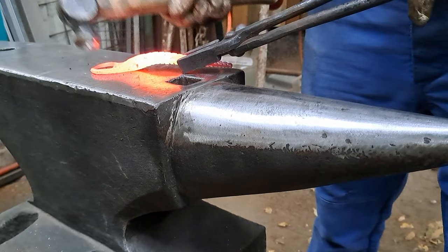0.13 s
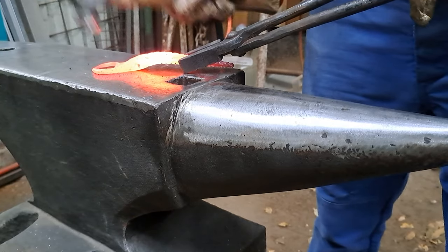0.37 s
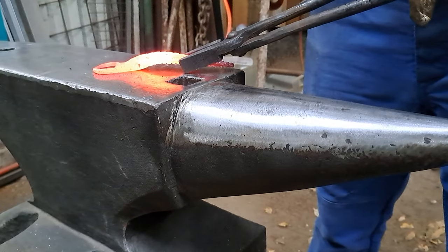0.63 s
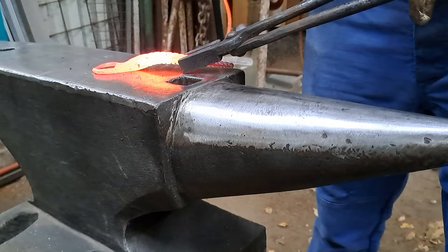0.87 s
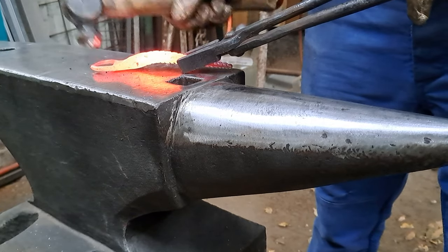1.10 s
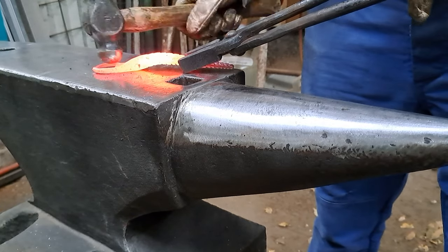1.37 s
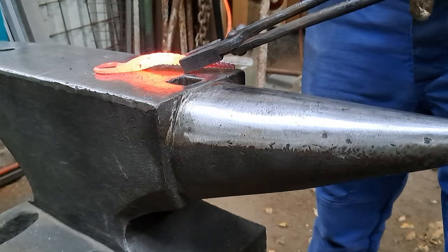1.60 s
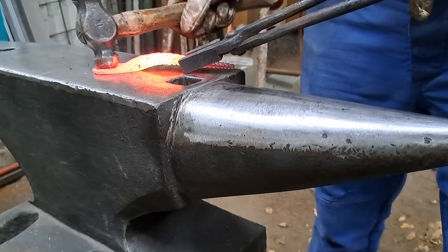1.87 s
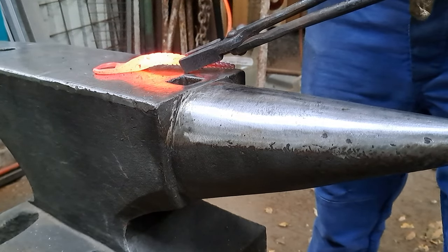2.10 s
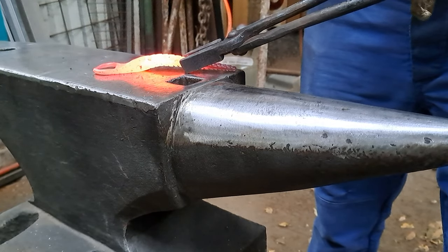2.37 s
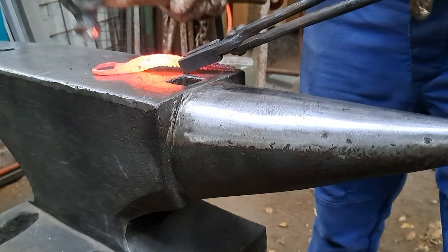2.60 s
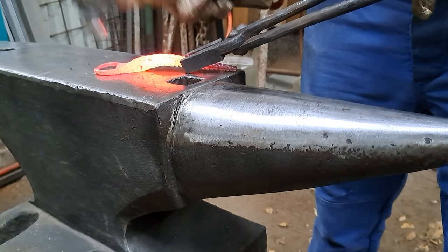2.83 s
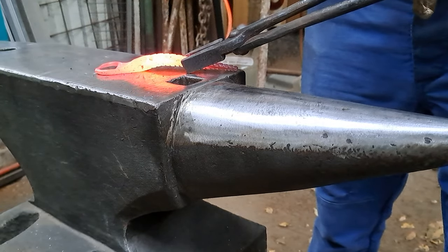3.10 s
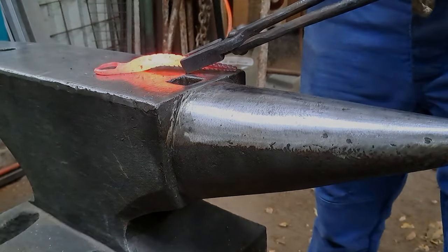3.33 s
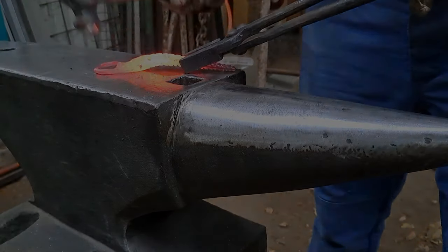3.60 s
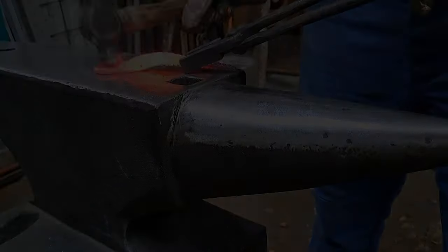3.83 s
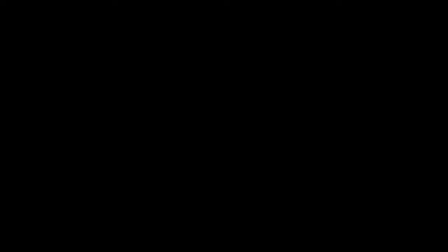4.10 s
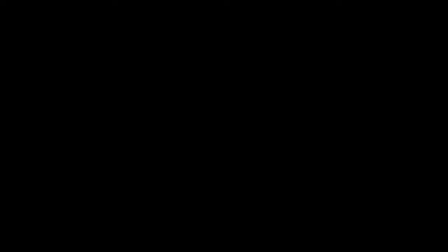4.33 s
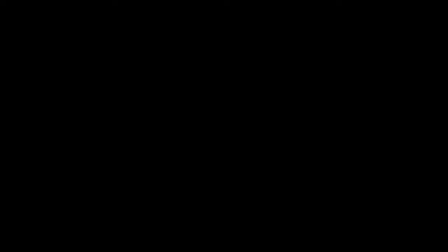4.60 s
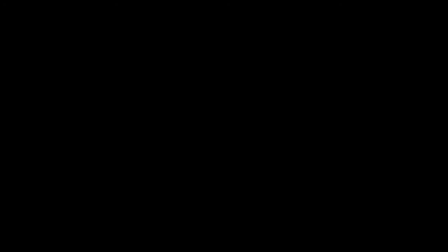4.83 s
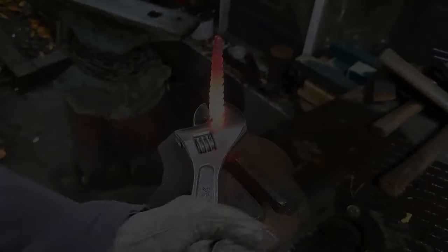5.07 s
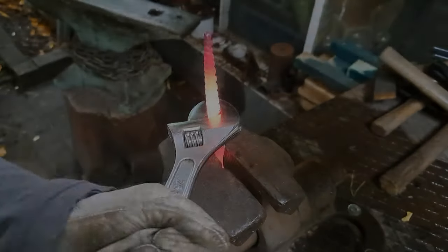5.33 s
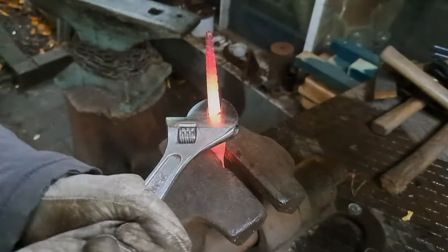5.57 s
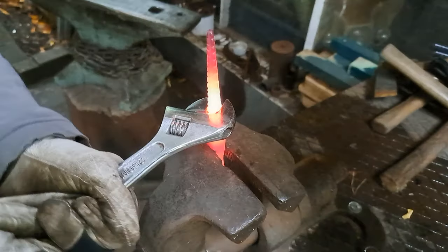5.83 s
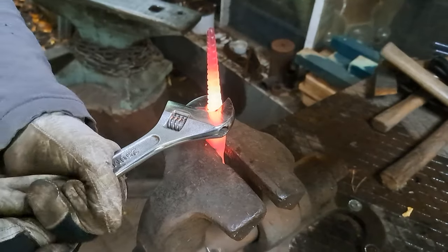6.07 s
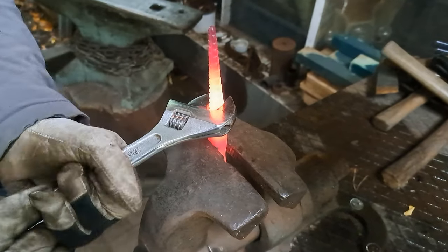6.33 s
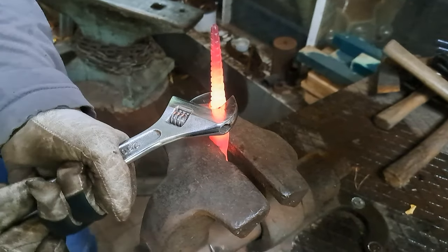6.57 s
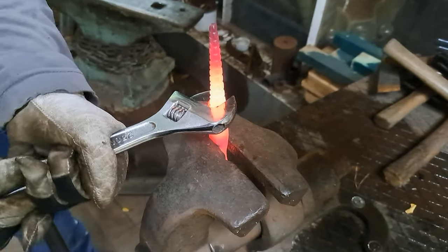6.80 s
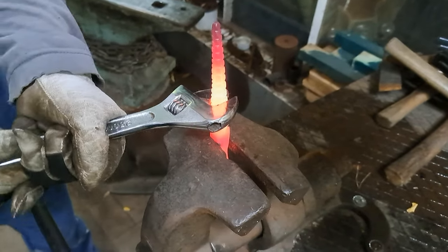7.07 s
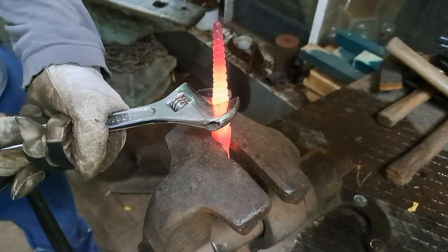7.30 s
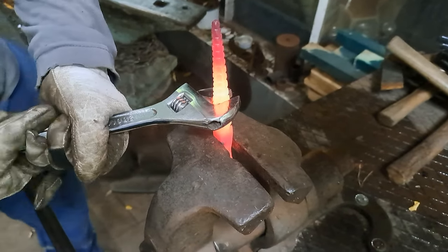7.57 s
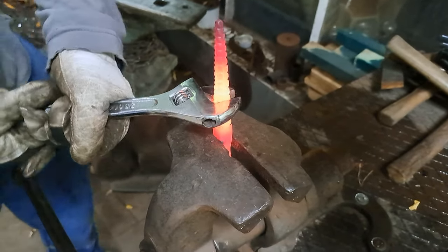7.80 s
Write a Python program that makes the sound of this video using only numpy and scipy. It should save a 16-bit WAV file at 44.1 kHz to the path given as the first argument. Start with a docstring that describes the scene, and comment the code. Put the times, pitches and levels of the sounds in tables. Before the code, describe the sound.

Close stereo pickup beside an anvil: twelve quick, slightly uneven hammer blows, piercing and metallic, the ring of one still sounding when the next lands, over a steady airy blower roar. The sound stops dead, leaving a short total silence. It resumes beside a vice in the same shed, with no blows, just a hollow, droning blower and irregular soft swells of deep rumble.

```python
"""A hand hammer strikes hot steel on a ringing anvil in a shed while a forge blower roars.
Each blow is a short noisy crack and thud, then dying tones (the anvil) and dying noise (clatter).
The blower is shaped noise throughout; a limiter ducks everything for a moment at each blow.
The sound stops dead, then returns from beside the vice, where only the blower is heard, boomier,
with some low rumble made of narrow-band noise."""
import sys
import numpy as np
from scipy import signal
from scipy.fft import rfft, irfft, next_fast_len
from scipy.io import wavfile
from scipy.ndimage import uniform_filter1d

SR = 44100
rng = np.random.default_rng(int(sys.argv[2]) if len(sys.argv) > 2 else 0)


def voltage_ratio(level):
    """Linear amplitude factor for a level in decibels (scalar or array-like)."""
    return 10 ** (np.asarray(level, float) / 20)


def master(y):
    """Save y as 16-bit WAV."""
    cut = np.clip(np.atleast_2d(y).T, -1, 1)
    pcm = np.round(cut * 32767)  # scale
    wavfile.write(sys.argv[1], SR, pcm.astype(np.int16))


N = 349713
STOP_S, RESUME_S = 4.0545, 4.8872   # silence between the anvil and the vice


def hammering():
    """Each blow stops the old ring and starts a new one; a short crack and thud lead."""
    # hammer blows: t/s, force/dB, crack/dB, thud/dB,
    # landing spot along the face (about -1..1), landing spot across it (-1..1)
    blows = [(0.1748, 0.85, -7, 0.5, 0.11, 0.67), (0.5004, 1, -3, 5.5, -1.18, -0.027),
             (0.8219, 5, -2.5, 2.5, 0.007, 0.9), (1.1431, -0.5, -3.5, 1.5, -0.44, -0.076),
             (1.4499, -1.6, -2.5, -0.3, -0.31, -0.37), (1.7807, 4, -4.5, 6, 0.46, -0.014),
             (2.3007, 0.9, -4, 11, 0.067, -0.34), (2.6348, 2, -3, 4.5, 0.28, -0.89),
             (2.9646, 4, -2.5, 0, 0.42, -0.16), (3.2939, 2.8, -0.5, 1.3, -0.022, -0.06),
             (3.606, 1.5, -5.5, 2, 0.69, -0.078), (3.9373, -1.5, -3.3, 2.5, -0.08, 0.18)]
    # one more blow, same columns, still ringing when the sound begins
    earlier_blow = (-.15, 2.5, -3.0, 3.0, -0.45, 0.4)
    blows = np.array([earlier_blow] + list(blows))
    onset, force_db, crack_db, thud_db, along, across = blows.T
    count = round(STOP_S * SR) + 1
    t = np.arange(count) / SR
    last = np.searchsorted(onset, t) - 1   # number of the latest blow at every sample
    since = t - onset[last]                # seconds since that blow
    out = np.zeros((2, N))
    out[:, :count] += anvil_ring(force_db - 4, along, across, last, since)
    # a heavier thud shakes the tongs more: 0.2 dB per dB
    out[:, :count] += clatter(force_db + 0.2 * thud_db + 0.96, last, since)
    return out + hammer_crack(onset[1:], crack_db[1:] + 16) + steel_thud(onset[1:], thud_db[1:] + 3)


def anvil_ring(ring_db, along, across, last, since, rise_s=0.0041, scatter_db=1.0):
    """The anvil rings in many pitches, each dying at its own pace and driven by where the blow lands."""
    # pitches of the anvil: f/Hz
    pitches = [1437, 1504, 2374, 2527, 2688, 3006, 3281, 3539, 3760, 3843, 4263, 4737, 4890, 5385, 5813,
               6613, 6785, 7095, 7703, 8543, 9595, 9829, 10072, 11132, 12152, 13024, 13146, 14233]
    # for each pitch: relative level/dB, time to die by 60 dB/s, left-right difference/dB,
    # left phase lead/rad, gain along the face/dB, gain across it/dB
    modes = [(-19.5, 2.16, -5, -0.65, -3, -0.1), (-21.5, 1.12, 6, -1.26, 0.9, -5.5),
             (-26, 0.62, -6, 0.5, 2.0, 2), (-25.8, 0.75, -1.5, 3.0, 6, -2.3), (-19, 0.28, 1.7, -1, 1.3, 3),
             (-33.5, 0.26, 4.5, 0.6, 0, 5), (-29, 0.36, 11.5, -0.5, 7, -0.8),
             (-35, 0.26, 10, 3.5, 3.5, 4.5), (-29.5, 0.27, -6.6, -3, 1, 3), (-36, 0.93, 10, -2, 6.5, 0),
             (-28, 0.46, -6.5, -1.6, -3, 4), (-31, 0.6, -5.5, -2, 8, -4), (-17, 0.3, 6, 3, -4.5, -3),
             (-29, 0.2, 14.5, 2, -6, -6), (-37.5, 0.32, 11.5, -0.3, 1.5, -5), (-29, 0.26, 7.5, 2, 4, 4.2),
             (-34, 0.19, 10.5, 1.5, 0.5, -8), (-37.5, 0.67, 3.5, -0.9, 1.5, -0.5),
             (-33.5, 0.18, 10.5, 1.5, -5.5, 4.5), (-45, 0.5, -2.3, 0.8, -2.4, -1.1),
             (-21, 0.22, 0.5, 1.5, 0.9, 7), (-18.5, 0.17, -3.5, 1.4, 8.5, 1.5),
             (-36.5, 0.37, 5, 0.2, -4, 1), (-45.5, 0.3, 2, 3.5, -7, 3.5), (-45.5, 0.45, 1, -2.4, -7.6, 2.4),
             (-33, 0.4, 4.5, -0.5, -8.5, 0.3), (-33.5, 0.35, -5.5, -1.5, -4, -3.5),
             (-36, 0.26, -0.5, 2.2, -7.0, -0.5)]
    luck = rng.standard_normal((len(ring_db), len(modes)))
    start = rng.uniform(0, 2 * np.pi, luck.shape)
    build_up = 1 - np.exp(-since / rise_s)   # the ring fills the shed over a few reflections
    out = np.zeros((2, len(since)))
    for k, (hz, (db, t60, pan_db, lead, along_db, across_db)) in enumerate(zip(pitches, modes)):
        # a blow near a still line of a pitch hardly drives it
        strength = db + ring_db + along * along_db + across * across_db + scatter_db * luck[:, k]
        height = voltage_ratio(strength[last] - 60 * since / t60) * build_up
        turn = 2 * np.pi * hz * since + start[last, k]
        out += height * sides(pan_db)[:, None] * np.sin([turn + lead, turn])
    return out


def clatter(clatter_db, last, since, rise_s=0.0022):
    """Hammer, tongs and shed rattle as dense noise that dies at a different pace in each band."""
    # clatter after a blow: f/Hz, relative level/dB, time to die by 60 dB/s
    bands = [(895, -22.5, 0.14), (1960, -22, 0.3), (2980, -19, 0.23), (4500, -24, 0.28), (6700, -22, 0.23),
             (8500, -35.5, 0.27), (10500, -22.5, 0.22), (12900, -28, 0.14), (15700, -45.5, .15)]
    count = len(since)
    size = next_fast_len(count)
    metal = irfft(rippled_noise(channels=2, size=size, cell_hz=29.6, depth_db=5.0), size)[:, :count]
    build_up = 1 - np.exp(-since / rise_s)
    edges = np.geomspace(650, 17000, num=13)
    out = np.zeros((2, count))
    for low, high in zip(edges, edges[1:]):
        hz = np.sqrt(low * high)
        band_pass = signal.butter(2, [low, high], "band", fs=SR, output="sos")
        band = rms_one(signal.sosfilt(band_pass, metal))
        level_db = at_hz(bands, hz) + clatter_db[last] - 60 * since / at_hz(bands, hz, column=2)
        out += band * voltage_ratio(level_db) * build_up * sides(1.5)[:, None]
    return out


def hammer_crack(onset, level_db):
    """The hammer face cracks: a very short burst through bright resonances."""
    # resonances of the crack: f/Hz, width/Hz, relative level/dB
    resonances = [(5450, 2300, -9), (7350, 4100, -11), (13180, 1500, 1)]
    return burst(onset, level_db, resonances, rise_s=0.00021)


def steel_thud(onset, level_db):
    """The soft hot steel yields: a slower burst through lower resonances."""
    # resonances of the thud: f/Hz, width/Hz, relative level/dB
    resonances = [(1860, 680, -4.5), (1000, 260, -4)]
    return burst(onset, level_db, resonances, rise_s=0.0013)


def burst(onset, level_db, resonances, rise_s, alike=0.66):
    """A brief burst of contact noise at each blow through a few broad resonances."""
    t = np.arange(round(0.014 * SR)) / SR
    shape = t / rise_s * np.exp(1 - t / rise_s)
    contact, out = np.full((2, N), 1e-18), 0
    for s, db in zip(onset, level_db):
        shared, *own = rng.standard_normal((3, len(t)))
        mixed = shape * (alike * shared + (1 - alike) * np.array(own))
        evened = mixed / np.sqrt(np.sum(mixed ** 2) / np.sum(shape ** 2))
        first = round(s * SR)
        contact[:, first:first + len(t)] = voltage_ratio(db) * evened
    for hz, width_hz, db in resonances:
        r = np.exp(-np.pi * width_hz / SR)   # a wider resonance dies sooner
        feed = [(1 - r * r) / 2, 0, (r * r - 1) / 2]
        back = [1, -2 * r * np.cos(2 * np.pi * hz / SR), r * r]
        out = out + voltage_ratio(db) * signal.lfilter(feed, back, contact)
    return out


def blower_at_anvil():
    """The blower's steady roar as heard at the anvil."""
    # diffuse roar: f/Hz, relative level per Hz/dB
    roar = [(18, -57), (30, -31.5), (75, -20), (161, -1), (266, -9.5), (526, -7.5), (740, -14), (1280, -22),
            (1460, -24.5), (1630, -29), (4080, -42), (7270, -42), (8980, -53), (14000, -43), (16000, -67.5)]
    # shed resonances: f/Hz, width/Hz, relative level/dB
    boom = [(62.9, 20, -19.5), (109, 11, -12), (158, 33.3, -1.5), (202, 19, -10), (246, 16, -13),
            (280.5, 14, -10), (334.9, 22, -7.5), (407.4, 45, -8), (476.3, 22, -5.5), (528.5, 15, -6.5),
            (598, 22, -12), (661.7, 18, -12), (890.4, 14, -12)]
    low, high = blower(roar, boom, roar_db=-6.5, lag_s=.00012)
    return voltage_ratio(-22) * rms_one(low + high)


def blower_at_vice(rumble_height):
    """The boomier roar at the vice, drifting in level and sinking while the rumble swells."""
    # diffuse roar: f/Hz, relative level per Hz/dB
    roar = [(18, -51), (30, -30), (86, -23), (157, -3.5), (233, -16), (295, -5), (345, -17), (486, -16.5),
            (684, -17.5), (801, -12.5), (1810, -33.5), (7270, -42), (9460, -47.5), (12600, -40),
            (16000, -49.5)]
    # shed resonances: f/Hz, width/Hz, relative level/dB
    boom = [(128.4, 12, -11.5), (150.5, 15.3, 0.5), (171.4, 16, -7), (190, 32, -10.5), (243, 18, -22),
            (292.3, 16.7, -3), (345.4, 11, -29.5), (387.2, 19, -11), (444.5, 23, -10), (460.7, 12, -12),
            (498.4, 28, -9.5), (572, 16, -25.5), (670, 21, -17.5), (776, 40, -13), (814, 22, -5.5),
            (967, 45, -30.5), (1153, 29.8, -10.5), (1300, 55, -29.5), (1496, 130, -30.5), (1983, 140, -36),
            (2530, 560, -45), (3285, 140, -55), (3760, 170, -45), (4420, 140, -44), (5650, 800, -41),
            (7230, 670, -37)]
    # drift before the sinking: t/s, level below 1 kHz/dB, level above 1 kHz/dB
    drift = [(4.9, -17.5, -35.5), (5.8, -18.5, -35.5), (6.9, -18, -35), (7.25, -16.5, -33),
             (7.5, -18.5, -33.5), (7.93, -19.5, -35)]
    low_db, high_db = in_time(drift)
    low, high = blower(roar, boom, roar_db=-6.5, lag_s=-.00048)
    sink = voltage_ratio(-3 * (rumble_height / voltage_ratio(-26.5)) ** 2)   # 3 dB down when the rumble stands at -26.5 dB
    return sink * (voltage_ratio(low_db) * rms_one(low) + voltage_ratio(high_db) * rms_one(high))


def blower(roar, boom, roar_db, lag_s):
    """Turbulent air: a diffuse roar, and shed resonances alike on both sides; low and high halves."""
    # how alike left and right are in the diffuse roar: f/Hz, likeness (0..1)
    likeness = [(60, 1), (300, 0.88), (640, 0.29), (1400, .1), (4000, 0.022)]
    # left-right balance: f/Hz, level difference/dB
    balance = [(60, 5.5), (240, 0), (950, 3.5), (3770, 7.5), (15000, 3.5)]
    size = next_fast_len(N)
    hz = np.maximum(np.arange(size // 2 + 1) * SR / size, 1)
    own = np.array(rippled_noise(channels=2, size=size, cell_hz=24.96, depth_db=3.5))
    shared, standing = rfft(rng.standard_normal((2, size)))
    alike = np.clip(at_hz(likeness, hz), 0, 1)
    # a positive lag delays the left side
    lag = np.exp(-2j * np.pi * hz * lag_s * np.array([[1], [0]]))
    mixed = np.sqrt(alike) * shared * lag + np.sqrt(1 - alike) * own
    diffuse = voltage_ratio(at_hz(roar, hz) + roar_db) * mixed
    power = sum(voltage_ratio(2 * db) / (1 + (2 * (hz - centre_hz) / width_hz) ** 2) ** 2
                for centre_hz, width_hz, db in boom)
    both = (diffuse + np.sqrt(power) * standing * lag) * sides(at_hz(balance, hz))
    low = 1 / (1 + (hz / 1000) ** 4)   # the halves meet at 1 kHz
    return irfft(both * low, size)[:, :N], irfft(both * (1 - low), size)[:, :N]


def rumble(height):
    """Lumpy low rumble: noise in a narrow band from 52 to 78 Hz, stronger on the left."""
    band = signal.butter(2, [52, 78], "band", fs=SR, output="sos")
    return height * rms_one(signal.sosfilt(band, rng.standard_normal(N))) * sides(2.6)[:, None]


def rumble_level():
    """Amplitude of the rumble: a floor and bell-shaped swells."""
    # swells above the floor: time of the top t/s, level added at the top/dB, half length/s
    swells = [(5.329, -36, 0.12), (5.642, -29.5, 0.12), (6.304, -36, .12), (6.507, -25.5, 0.074),
              (7.003, -34.5, 0.085), (7.138, -39, 0.077), (7.393, -31.5, 0.051), (7.711, -30, .05)]
    t = np.arange(N) / SR
    floor = voltage_ratio(-43.5)
    return floor + sum(voltage_ratio(db) * np.exp(-((t - s) / half_s) ** 2) for s, db, half_s in swells)


def rippled_noise(channels, size, cell_hz, depth_db):
    """Spectrum of white noise with fixed narrow peaks and dips, as many small resonances leave them."""
    cells = np.arange(size // 2 + 1) * SR / size / cell_hz
    count = int(cells[-1]) + 2
    ripple = [np.interp(cells, np.arange(count), rng.standard_normal(count)) for _ in range(channels)]
    return rfft(rng.standard_normal((channels, size))) * voltage_ratio(depth_db * np.array(ripple))


def rms_one(x):
    """Scale to an rms (average strength) of one."""
    return x / np.sqrt(np.mean(x ** 2) + 1e-20)


def in_time(rows):
    """Read the columns of a table over time at every sample."""
    s, *columns = np.transpose(rows)
    return [np.interp(np.arange(N) / SR, s, c) for c in columns]


def at_hz(points, hz, column=1):
    """Read a table on a log-frequency axis."""
    points = np.array(points)
    return np.interp(np.log(hz), np.log(points[:, 0]), points[:, column])


def sides(db):
    """Left and right gains for a level difference."""
    return voltage_ratio(np.array([db / 2, -db / 2]))


def scene():
    """Two places in the shed, one after the other."""
    at_anvil = blower_at_anvil() + hammering()
    rumble_height = rumble_level()
    at_vice = blower_at_vice(rumble_height) + rumble(rumble_height)
    return np.where(np.arange(N) / SR < (STOP_S + RESUME_S) / 2, at_anvil, at_vice)


def limiter_gain(dry):
    """A look-ahead limiter turns down before a peak and lets go exponentially."""
    ceiling_db, squeeze = -6, 0.69   # each dB over the ceiling asks for 0.69 dB of ducking
    ahead_s, release_s = 0.0086, 0.028
    t = np.arange(N) / SR
    peak_db = 20 * np.log10(np.abs(dry).max(axis=0) + 1e-9)
    over = np.maximum(peak_db - ceiling_db, 1e-3)
    # the excess in dB is held at each peak and then decays
    held = np.exp(np.maximum.accumulate(np.log(over) + t / release_s) - t / release_s)
    ahead = round(ahead_s * SR)
    # average over the time just ahead
    held = uniform_filter1d(np.append(held[ahead // 2:], np.zeros(ahead // 2)), ahead)
    return voltage_ratio(-squeeze * held)


def top_cut(x):
    """Nothing passes above the cut-off."""
    return signal.sosfilt(signal.butter(12, 17060, fs=SR, output="sos"), x)


def record(dry):
    """The microphone's dull top, the limiter, silence between the two places, and soft clipping."""
    mic_top_hz, clip_top = 16300, 1.9
    t = np.arange(N) / SR
    dull = signal.sosfilt(signal.butter(8, mic_top_hz, fs=SR, output="sos"), dry)
    playing = (t < STOP_S) | (t > RESUME_S)
    ducked = dull * limiter_gain(dry) * playing
    mix = clip_top * np.tanh(ducked / clip_top)
    return top_cut(mix)


dry = scene()
out = record(dry)
master(out)
```